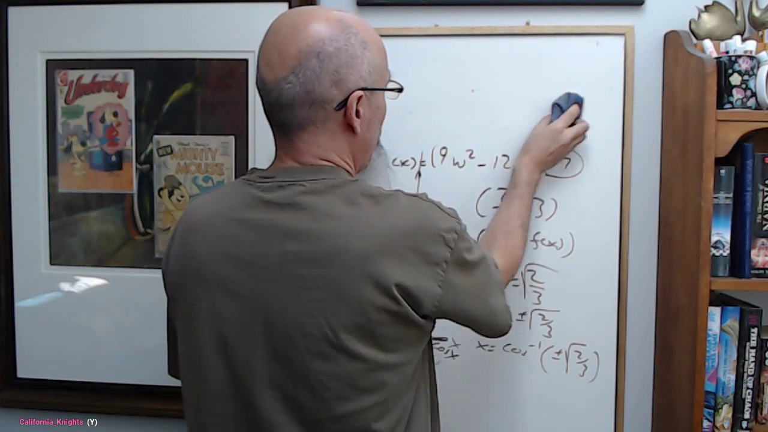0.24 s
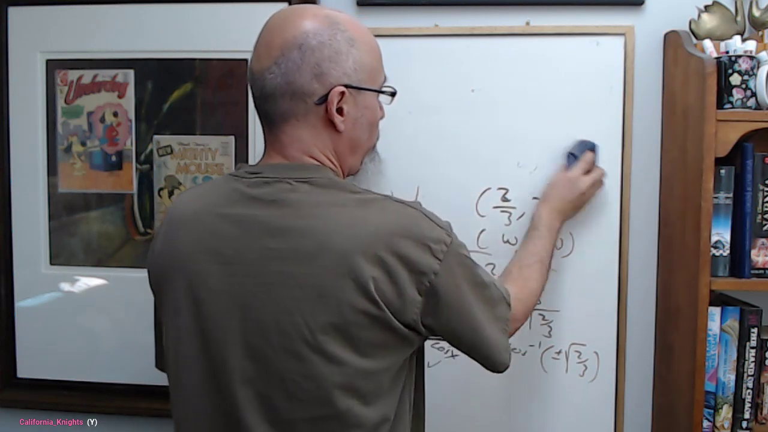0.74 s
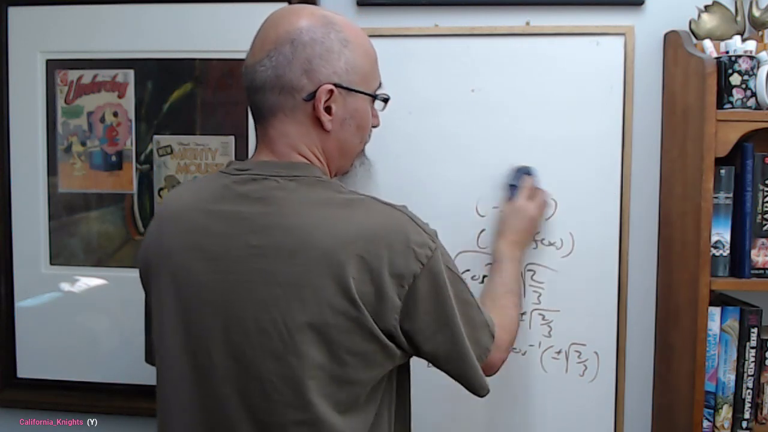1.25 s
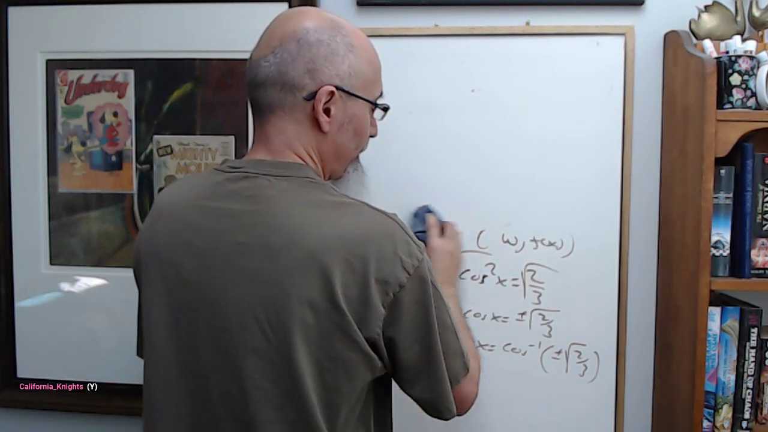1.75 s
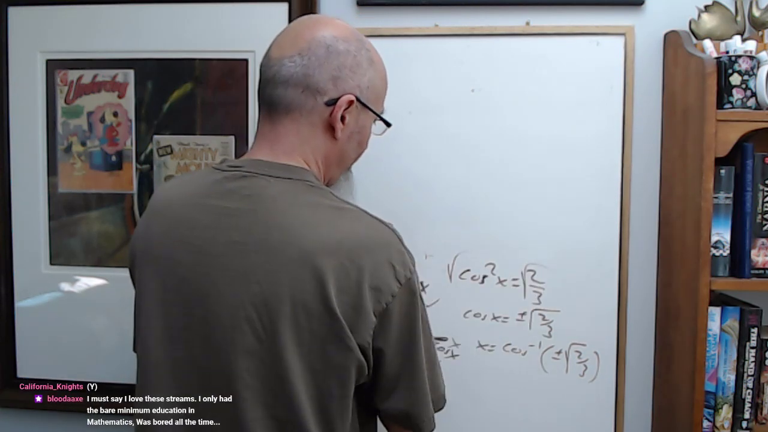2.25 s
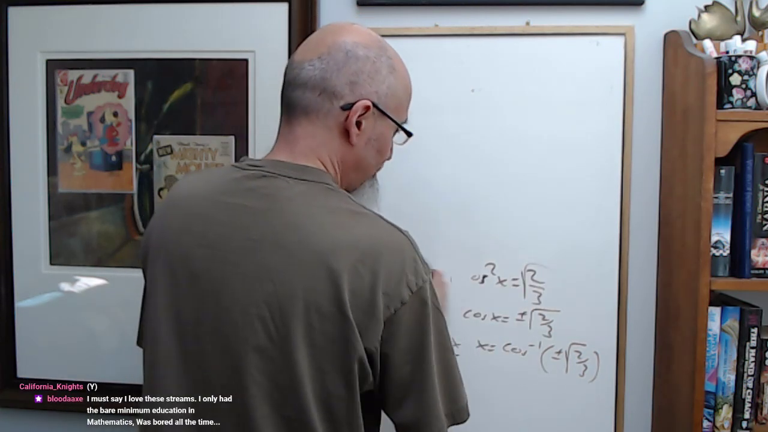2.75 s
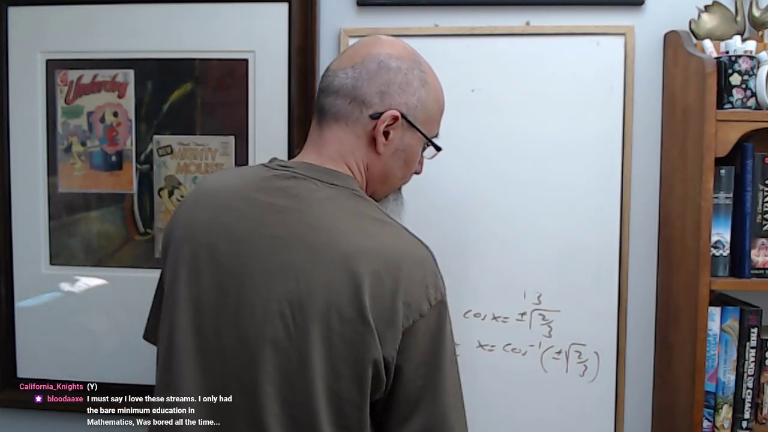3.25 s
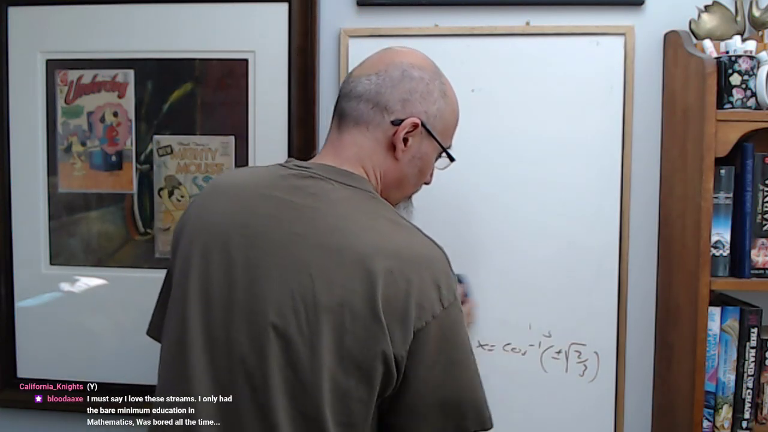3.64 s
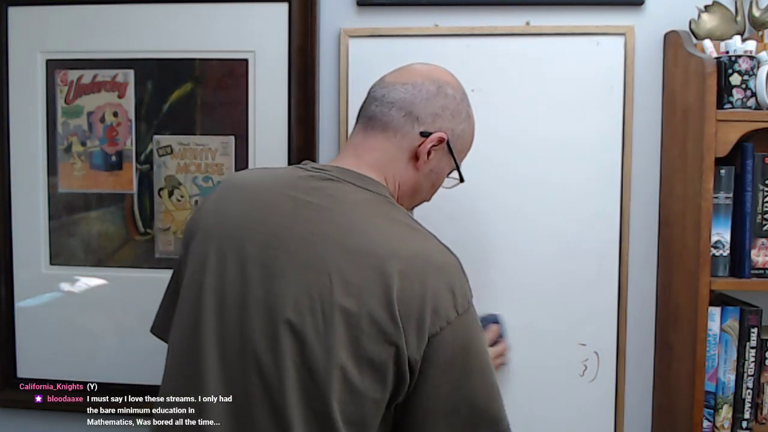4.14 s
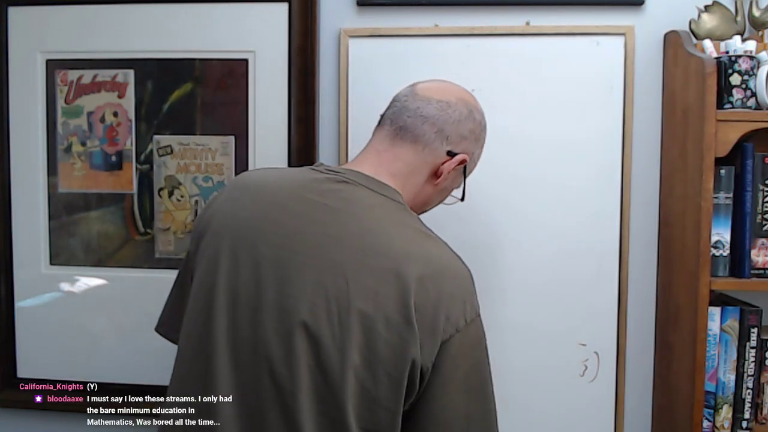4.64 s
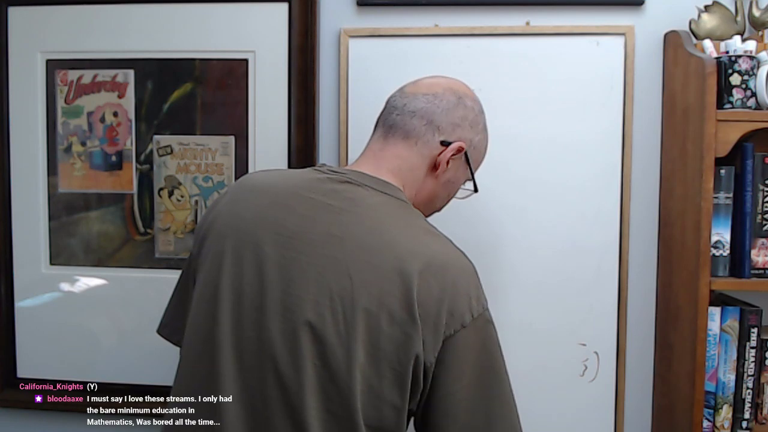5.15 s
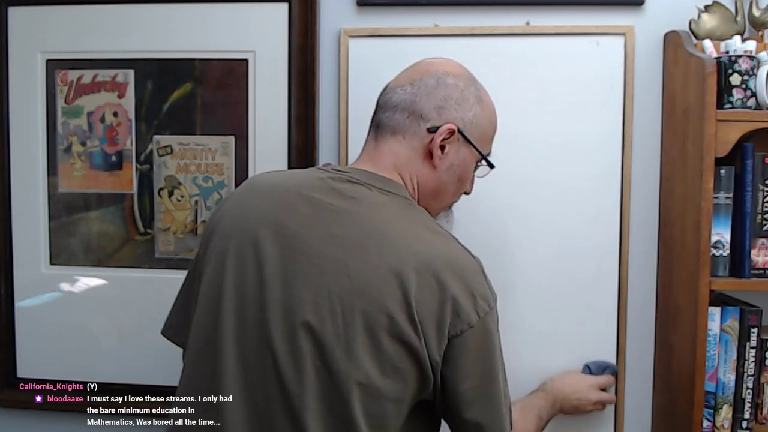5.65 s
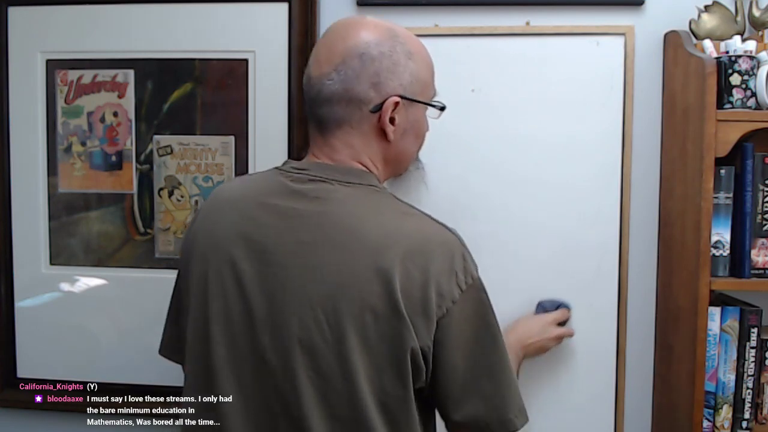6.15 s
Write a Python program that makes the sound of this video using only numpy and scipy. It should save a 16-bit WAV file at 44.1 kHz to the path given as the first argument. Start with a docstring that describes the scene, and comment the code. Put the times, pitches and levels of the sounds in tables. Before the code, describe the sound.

Brisk, dry swishes of an eraser on a loosely hung whiteboard, the board knocking dully against the wall, over steady low fan noise.

```python
"""Quick back-and-forth hisses are heard first: a felt eraser wipes a whiteboard in a small, quiet room.
Stick-slip of the fibres makes noise that is brighter the faster the felt slides.
The loosely hung board rings in damped bending modes as it knocks against the wall, trembles and judders;
its sway rumbles, the eraser's hard shell ticks now and then, and one brief high squeak is heard.
A cooling fan adds air noise and two faint, slowly drifting tones near the single microphone."""
import sys
import numpy as np
from scipy import signal
from scipy.fft import rfft, irfft, next_fast_len
from scipy.io import wavfile
from scipy.ndimage import uniform_filter1d, map_coordinates

SR = 44100
rng = np.random.default_rng(int(sys.argv[2]) if len(sys.argv) > 2 else 0)


def to_wav(sig):
    """Store sig (one row per channel, or 1-D mono) as 16-bit WAV at the path in sys.argv[1].

    Samples outside -1..1 are clipped; the rate is SR.
    """
    pcm = np.clip(np.atleast_2d(sig), -1, 1) * 32767
    pcm = np.round(pcm).astype(np.int16)
    wavfile.write(sys.argv[1], SR, pcm.T)  # frames by channels


N = 282372  # samples in the scene

# Knocks of the board against the wall. Each row: start in seconds, relative strength in dB,
# relative level of the low thump in dB, relative level of the upper modes (hardness) in dB.
KNOCKS = [(0.051, -38, -14, -1), (0.131, -37, -1, -13), (0.589, -25.5, -10, -9.5), (0.7038, -24.5, -8, -17),
          (0.885, -18.5, -9.5, -15.5), (1.160, -26.5, -9.5, -11), (1.262, -19.5, -10, -14),
          (1.451, -29.5, -19, -24), (1.467, -25.5, -6, -2.5), (1.705, -21, -11, -11),
          (1.857, -25.5, -6, -17), (1.994, -30, -14, -20), (2.478, -31.5, -20, -24), (2.796, -34, -5, 5),
          (2.874, -30, -16, 7), (2.881, -29.5, -3, -15), (2.995, -30, -17.5, -21),
          (3.292, -30.5, -8.5, -15), (3.418, -22.5, -15.5, -17.5), (3.539, -36.5, -21, -14),
          (4.530, -32.5, -6, -9), (4.572, -33, -19, -13), (4.590, -24.5, -16, -4.5),
          (4.598, -22.5, -18, -25), (4.754, -38.5, -12, -20), (6.215, -29.5, -16.5, -22)]
# Wiping strokes, rightward and leftward in turn; each ends where the next starts. Each row: start in
# seconds, top speed from 0 to 1, share of the stroke spent speeding up, pressure on the felt in dB.
STROKES = [(-0.02, 0.7, 0.36, 1.7), (.257, 0.77, .57, -0.6), (.526, 0.8, 0.59, .5), (.853, .83, .56, -1.5),
           (1.116, 0.93, 0.58, -0.1), (1.398, .8, 0.58, -0.1), (1.667, 0.85, 0.66, -0.2),
           (1.995, 0.72, 0.51, -0.5), (2.3, 0.71, 0.65, 0), (2.491, 0.62, 0.41, -0.7),
           (2.697, .83, 0.6, -0.5), (2.993, 0.86, 0.66, -1.5), (3.261, 0.85, 0.55, -0.7),
           (3.53, 0.78, 0.66, -0.8), (3.813, 0.77, 0.44, -0.5), (4.068, 0.9, 0.6, -1.6),
           (4.367, 0.52, 0.38, -0.3), (4.558, 0.51, 0.3, 2), (4.704, .35, .57, -4), (4.919, .35, .34, .5),
           (5.053, 0.8, .56, -2), (5.421, .48, .55, -2.6), (5.576, .49, .62, -2), (5.757, .25, .43, 1.4),
           (6.087, 0.67, 0.6, -3.5)]


def amp(db):
    """Decibels to amplitude gain, by the definition of the decibel."""
    return 10 ** (np.asarray(db) / 20)


def unit(x):
    """Scale to a root-mean-square value of 1."""
    return x / np.sqrt(np.mean(x ** 2) + 1e-20)


def along(points, hz):
    """Interpolate (Hz, value) points linearly over logarithmic frequency."""
    point_hz, value = np.transpose(points)
    return np.interp(np.log(hz + 1), np.log(point_hz + 1), value)


def wobble(rate):
    """Slow random modulation: a spline through normal random knots, rate knots a second."""
    knots = rng.standard_normal(int(N * rate / SR) + 4)
    return map_coordinates(knots, [np.arange(N) * rate / SR])


def filtered(x, response):
    """Linear filtering: multiply the spectrum of x by a response of frequency."""
    size = next_fast_len(N + SR // 2)
    hz = np.fft.rfftfreq(size, 1 / SR)
    return irfft(rfft(x, size) * response(hz), size)[:N]


def shaped_noise(spectrum):
    """Spectral shaping: white noise filtered to a table of levels, at rms 1."""
    return unit(filtered(rng.standard_normal(N), lambda hz: amp(along(spectrum, hz))))


def add(track, s, sound):
    """Superposition: mix a sound into the track at time s, cut at the track's end."""
    space = track[round(s * SR):][:len(sound)]
    space += sound[:len(space)]


def in_room(sound, wet_db, gap):
    """Reverberation: a diffuse tail builds up over the gap (s) and decays at a rate set by frequency."""
    # Reverberation time. Each row: frequency in Hz, time to decay by 60 dB in seconds.
    room_decay = [(150, 0.64), (500, 0.21), (1500, 0.48), (8000, 0.13)]
    hz, t, spectra = signal.stft(rng.standard_normal(SR // 2), SR, nperseg=256)
    decay = amp(-60 * t / along(room_decay, hz)[:, None])
    tail = signal.istft(spectra * decay, SR, nperseg=256)[1]
    tail *= 1 - np.exp(-(np.arange(len(tail)) / SR / gap) ** 2)
    response = amp(wet_db) * tail / np.linalg.norm(tail)
    response[0] += 1  # direct sound
    return signal.fftconvolve(sound, response)


def fan(air_db=-53.5, lower_db=-61, upper_db=-66, lower_swing_db=1.1, upper_swing_db=3.0,
        flutter_hz=.5, waver_db=1.1):
    """Broadband flow noise with two tones whose pitch follows the fan's speed, stronger when it runs slow."""
    # Fan air and room rumble. Each row: frequency in Hz, relative spectral level in dB per Hz.
    air_spectrum = [(20, 7.5), (50, 6), (90, 1.5), (150, 1), (260, -4), (450, -7), (700, -1.5), (1100, -2),
                    (1340, 3), (2000, -2.5), (3200, -11), (5000, -26), (8200, -16), (10200, -24),
                    (15700, -26)]
    whine_hz, swing_hz, upper_ratio = 1515, 10, 1.1442
    hunt_period_s, fastest_at_s = 2.63, 2.48
    hunt = np.cos(2 * np.pi * (np.arange(N) / SR - fastest_at_s) / hunt_period_s)
    pitch = whine_hz + swing_hz * hunt + flutter_hz * wobble(24.8)

    def tone(hz, db):
        """Frequency modulation: the phase is the running sum of the pitch."""
        sine = np.sqrt(2) * np.sin(2 * np.pi * np.cumsum(hz) / SR)  # rms 1
        return sine * amp(db + waver_db * wobble(6))

    lower = tone(pitch, lower_db - lower_swing_db * hunt)
    upper = tone(upper_ratio * pitch, upper_db - upper_swing_db * hunt)
    return amp(air_db) * shaped_noise(air_spectrum) + lower + upper


def sway(rest_db=-64, turn_db=-49.5, knock_db=-34, rise_s=0.078):
    """Sway after an impulse: deep noise swells and sinks after knocks and as the arm leans into leftward strokes."""
    # The board and wall swaying. Each row: frequency in Hz, relative spectral level in dB per Hz.
    rumble_spectrum = [(15, -2), (25, 0.5), (38, -9), (52, -2.5), (70, -10), (100, -5), (140, -16.5),
                       (300, -33), (1000, -90)]
    t = np.arange(N) / SR
    leftward = STROKES[1::2]
    pushes = [(s, amp(turn_db) * speed) for s, speed, _, _ in leftward]
    pushes += [(s, amp(db + knock_db)) for s, db, _, _ in KNOCKS]
    power = np.full(N, amp(rest_db) ** 2)
    for s, strength in pushes:
        age = np.maximum(t - s, 0) / rise_s  # each swell is widest at age 1
        power += (strength * age * np.exp(1 - age)) ** 2
    return np.sqrt(power) * shaped_noise(rumble_spectrum)


def board_ring(t, thump_db, hard_db, scatter_db=2, detune=0.019):
    """Modal superposition: one push starts damped modes that swell as the bending spreads."""
    # The board's modes. Each row: nominal frequency in Hz, relative level in dB,
    # time to decay by 60 dB in seconds, time constant of the swell in seconds.
    modes = [(142.2, -3.5, 0.12, 0.0023), (182, -7.5, 0.06, 0.0018), (219.6, -8.5, 0.059, 0.002),
             (328.4, -5, 0.039, 0.00064), (375, -10.5, 0.031, 0.0022), (447.6, -2, 0.043, 0.003),
             (505.5, -9, 0.04, 0.004), (564, -8.5, 0.031, 0.0096), (661, -15, 0.032, 0.004),
             (772, -9.5, 0.031, 0.0036), (928, -17, 0.033, .005), (1092, -12.5, 0.014, 0.0014),
             (1327, -26.5, 0.044, 0.0016)]
    hz, db, t60, swell = np.transpose(modes)[:, :, None]
    colour = along([(230, thump_db), (370, 0), (560, 0), (800, hard_db)], hz)
    # the hand's place shifts each mode a little in level and pitch
    strength, shift = rng.standard_normal((2, len(hz), 1))
    shape = (1 - np.exp(-t / swell)) ** 2 * amp(-60 * t / t60)
    shape /= shape.max(axis=1, keepdims=True)
    level = amp(db + colour + scatter_db * strength)
    vibration = np.sin(2 * np.pi * hz * (1 + detune * shift) * t)
    sense = (-1) ** np.arange(len(hz))  # neighbouring modes move in opposite senses
    return sense @ (level * shape * vibration)


def shudder(level_db=-63, uneven_db=0.5, judder_db=-1, hard_db=-4):
    """Forced vibration: random felt drag drives the board's modes, faintly throughout and in soft judders."""
    # Judders of the eraser. Each row: middle in seconds, relative rms level in dB,
    # half length (standard deviation of the swell) in seconds, relative level of the low thump in dB.
    judders = [(0.235, -51.5, 0.016, -8), (0.34, -53.5, 0.011, -5), (0.674, -46.5, 0.0077, -13),
               (0.861, -45, 0.0098, 5), (1.232, -47, 0.018, -12), (1.492, -37, 0.023, -10.5),
               (2.437, -52, 0.018, -24), (2.897, -44, 0.029, -1), (3.015, -49, .028, -3),
               (4.097, -40, 0.023, 4.5), (4.653, -48, 0.043, 6), (4.79, -49.5, 0.015, 11),
               (5.396, -43, 0.013, -5), (5.452, -44, 0.026, 6), (5.998, -53, 0.057, 3),
               (6.26, -49.5, 0.013, 7)]
    t = np.arange(SR // 4) / SR
    drag = rng.standard_normal(N) * amp(uneven_db * wobble(12))
    tremble = signal.fftconvolve(drag, board_ring(t, -6.5, -1))[:N]
    track = amp(level_db) * unit(tremble)
    middle = t.mean()
    for s, db, half, thump in judders:
        swell = np.exp(-((t - middle) / half) ** 2 / 2)
        force = rng.standard_normal(2 * len(t) - 1)
        shake = swell * signal.fftconvolve(force, board_ring(t, thump, hard_db), "valid")
        shake *= amp(db + judder_db) * np.linalg.norm(swell) / np.linalg.norm(shake)
        add(track, s - middle, in_room(shake, wet_db=-14.0, gap=0.0043))
    return track


def ticks(crack_db=-8, crack_hz=4000, crack_t60=0.0048, rattle_db=-18, rattle_t60=0.012):
    """Impact and resonance: a crack, a few cycles of ringing and a rattle form each tick and the one squeak."""
    # Ticks of the shell, and one brief high squeak at 4.074 s. Each row: start in seconds, level in dB,
    # pitch in Hz, relative level of the crack in dB.
    ticks_and_squeak = [(0.0518, -31, 5300, 5), (0.670, -38, 5860, 16), (1.23, -36.5, 5800, 11),
                        (1.4685, -17, 6060, -4), (2.7962, -28.5, 5800, -6), (2.8745, -32, 5800, -4),
                        (2.877, -29.5, 5870, -7), (4.074, -32, 13500, -10), (4.593, -30.5, 6000, -7)]
    track, t = np.zeros(N), np.arange(SR // 20) / SR
    rise = .0002  # s to the peak of the ping's envelope

    def band(hz, q):
        """Resonant filtering of white noise, at rms 1."""
        b, a = signal.iirpeak(hz, q, SR)
        return unit(signal.lfilter(b, a, rng.standard_normal(len(t))))

    for s, db, hz, sharp_db in ticks_and_squeak:
        ping = t / rise * np.exp(1 - t / rise) * np.sin(2 * np.pi * hz * t)
        crack = band(crack_hz, 0.91) * amp(crack_db + sharp_db - 60 * t / crack_t60)
        rattle = band(hz, 4.3) * amp(rattle_db - 60 * t / rattle_t60)
        add(track, s, in_room(amp(db) * (ping + crack + rattle), wet_db=-9, gap=0.0023))
    return track


def knocks(level_db=-10.0, thump_db=7, hard_db=12, frame_db=-8, frame_delay=0.004684,
           frame_spread=0.00046, rebound_db=-15, rebound_s=.024, rebound_scatter=0.201):
    """Impact and reflection: the hand's changing push tips the board against the wall, where it bounces once."""
    track, t = np.zeros(N), np.arange(SR // 3) / SR
    body = SR // 60  # samples in the loud first part of a knock

    def later(sound, delay):
        """Propagation delay in seconds."""
        return np.interp(t - delay, t, sound, left=0)

    for s, db, thump, hardness in KNOCKS:
        ring = board_ring(t, thump + thump_db, hardness + hard_db)
        # the bending wave comes back from the frame
        return_s = frame_delay + frame_spread * rng.standard_normal()
        ring = ring + amp(frame_db) * later(ring, return_s)
        bounce_s = rebound_s * np.exp(rebound_scatter * rng.standard_normal())
        ring = ring + amp(rebound_db) * later(ring, bounce_s)
        knock = amp(db + level_db) * ring / ring[:body].std()
        add(track, s, in_room(knock, wet_db=-9.5, gap=0.0078))
    return track


def hand(t):
    """Reciprocating motion: speed arches between turns; returns speed and pressure (dB) at the times t."""
    last_end_s = 6.77
    roundness, creep = 0.77, 0.27  # of the speed arch; speed left as the hand loops through a turn
    start, top, share, pressure_db = np.transpose(STROKES)
    turns = np.append(start, last_end_s)
    crest = start + share * np.diff(turns)
    marks = np.sort(np.append(turns, crest))
    progress = np.interp(t, marks, np.arange(len(marks)) / 2)  # counted in strokes
    stroke = np.minimum(progress.astype(int), len(start) - 1)
    arch = np.abs(np.sin(np.pi * progress)) ** roundness
    speed = np.hypot(creep, top[stroke] * arch)
    return speed, np.interp(t, crest, pressure_db)


def felt(level_db=-43.5, corner_hz=11500, slope=4.12, growth=0.036, patchy_db=1.16, grain_db=0.64,
         unsteady=0.028):
    """Stick-slip friction of countless fibres: faster sliding shortens each slip and lifts the upper corner."""
    # Felt before the effect of speed. Each row: frequency in Hz, relative spectral level in dB per Hz.
    felt_spectrum = [(300, -19), (900, -7.5), (2500, -2.5), (4500, -3), (6000, -2), (8400, 0), (10200, -4),
                     (12500, -1), (15700, -1.5)]
    hz, t, spectra = signal.stft(shaped_noise(felt_spectrum), SR, nperseg=512)
    speed, pressure_db = hand(t)
    speed = speed * np.exp(unsteady * np.interp(t, np.arange(N) / SR, wobble(25)))
    rolloff = np.sqrt(1 + (hz[:, None] / (corner_hz * speed)) ** slope)
    brightness = speed ** growth / rolloff
    # the colour shifts as the eraser travels over the board: noise smoothed over frequency, then time
    patches = uniform_filter1d(rng.standard_normal(spectra.shape), size=6, axis=0)
    patches = unit(uniform_filter1d(patches, size=16, axis=1))
    gain = brightness * amp(pressure_db + patchy_db * patches)
    hiss = signal.istft(spectra * gain, SR, nperseg=512)[1][:N]
    # dried ink makes the drag slightly uneven
    return hiss * amp(level_db + grain_db * wobble(160))


def scene():
    """Superposition of all sources at one microphone, which feeds both channels."""
    mono = fan() + sway() + shudder() + ticks() + knocks() + felt()
    return np.array([mono, mono])


def record(dry):
    """Band limiting: nothing is kept from the top frequency upward."""
    top_hz = 15750
    return np.array([filtered(channel, lambda hz: hz < top_hz) for channel in dry])


dry = scene()
out = record(dry)
to_wav(out)
```